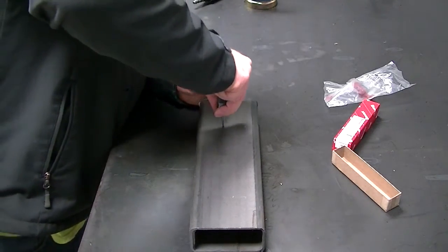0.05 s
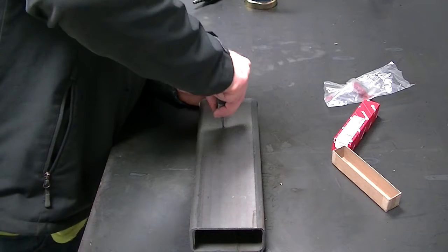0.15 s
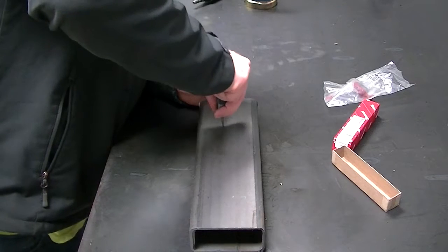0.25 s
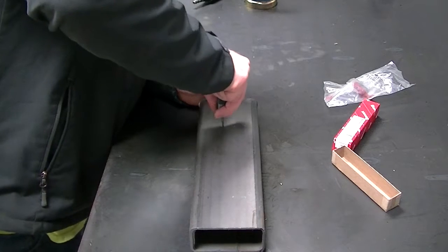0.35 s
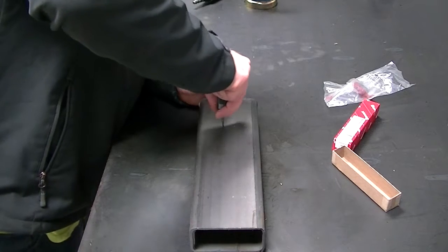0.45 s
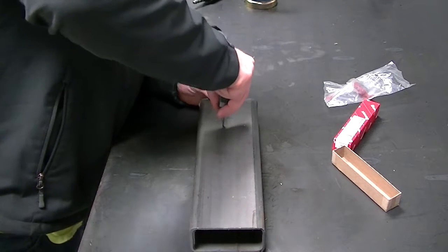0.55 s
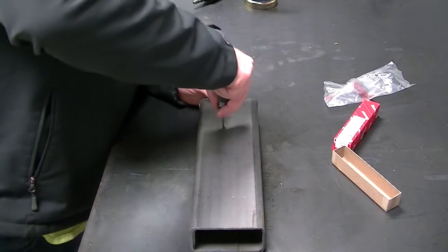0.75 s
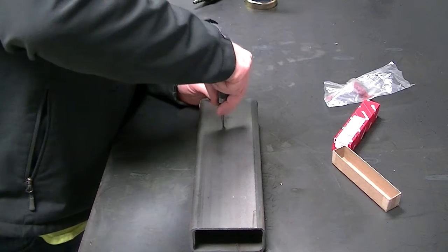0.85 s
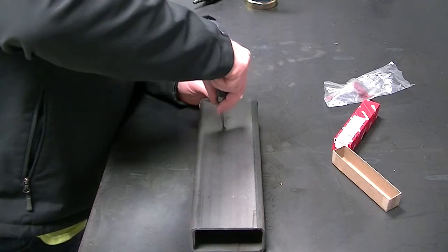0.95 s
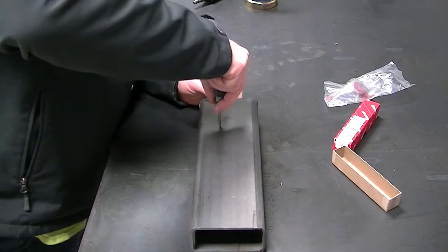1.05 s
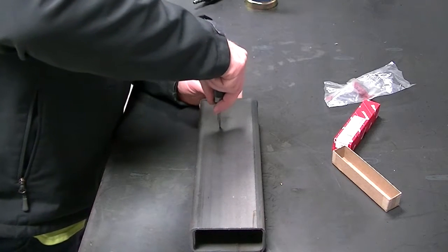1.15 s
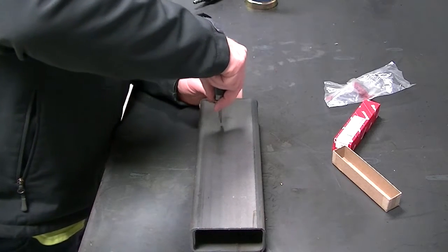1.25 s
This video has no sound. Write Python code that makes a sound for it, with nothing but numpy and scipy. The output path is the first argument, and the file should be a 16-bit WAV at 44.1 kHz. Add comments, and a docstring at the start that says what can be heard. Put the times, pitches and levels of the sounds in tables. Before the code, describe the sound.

One sharp metallic snap of a spring punch on a steel tube overloads the nearby microphone. A short, high ring fades into the echo of a hard workshop, followed by a few quieter spring clicks and dull knocks.

```python
"""An automatic centre punch is pressed onto a steel box tube on a bench in a hard, echoing workshop.
A hollow resonance fades and a sleeve rustles; the plunger knocks under load, scrapes, and fires.
The tube rings briefly and the bench thuds; the blow overloads the microphone and fills the room.
As the hand eases off, spring and plunger click back.
A low, hollow resonance follows the last knock, with faint hiss."""
import sys
import numpy as np
from scipy import signal
from scipy.fft import rfft, irfft
from scipy.io import wavfile

SR = 44100
rng = np.random.default_rng(int(sys.argv[2]) if len(sys.argv) > 2 else 0)


def dump_mix(stems):
    """Bounce the given channels to the path in sys.argv[1] as a 16-bit WAV at rate SR."""
    frames = np.atleast_2d(stems).T  # one column per channel
    limited = np.clip(frames, -1, 1)  # hard clip at full scale
    pcm = np.round(limited * 32767).astype(np.int16)
    wavfile.write(sys.argv[1], SR, pcm)


N = 57330
FIRE_S = 0.2361
# spectrum of hiss and sleeve crackle: freq_hz, density_db
HISS_SPECTRUM = [(500, 0), (2000, 16), (5000, 8.5), (9000, 2), (15000, -3)]


def undb(db):
    """Decibels to gain."""
    return 10 ** (np.asarray(db) / 20)


def clock():
    """Sample times in seconds."""
    return np.arange(N) / SR


def fade(t60_s):
    """Exponential decay, 60 dB down at t60_s."""
    return np.exp(-np.log(1000) * clock() / max(t60_s, 1e-3))


def at(start_s, x):
    """Delay x to start_s."""
    return np.concatenate([np.zeros(max(int(start_s * SR), 0)), x])[:N]


def colour(x, spectrum):
    """Unit-energy minimum-phase filter through (freq_hz, level_db) points; rolls off below the first."""
    hz, db = np.array(spectrum, float).T
    freq_hz = np.maximum(np.fft.rfftfreq(N, 1 / SR), 10)
    gain = undb(np.interp(np.log(freq_hz), np.log(hz), db)) * np.minimum(freq_hz / hz[0], 1) ** 2
    cepstrum = irfft(np.log(gain / np.sqrt(np.mean(gain ** 2))), N)
    cepstrum[1:N // 2] *= 2
    cepstrum[N // 2 + 1:] = 0
    return irfft(rfft(x) * np.exp(rfft(cepstrum)), N)


def noise(spectrum, envelope=1):
    """Unit-rms noise, enveloped, then coloured."""
    return colour(rng.standard_normal(N) * envelope, spectrum)


def ring(modes, scale=1):
    """Struck modes: decaying sines of alternating sign."""
    return sum((-1) ** k * undb(db) * fade(t60_s) * np.sin(2 * np.pi * freq * scale * clock())
               for k, (freq, db, t60_s) in enumerate(modes))


def hollow_resonance():
    """A low, hollow resonance fades at the start and follows the last knock, with faint hiss."""
    # start_s, length_s, hollow_db, hiss_db
    swells = [(-.04, 0.1, -37, -61), (.01, 0.22, -44, -48), (1.084, 0.12, -46.5, -66),
              (1.142, 0.17, -50, -67.5)]
    # freq_hz, density_db
    hollow_spectrum = [(110, -22), (165, -5.5), (240, -11), (320, -4.5), (420, 3), (540, -2.5), (700, 0.5),
                       (900, -8.5), (1200, -3), (2200, -15), (4000, -26), (15000, -33)]
    hollow, hiss = noise(hollow_spectrum), noise(HISS_SPECTRUM)
    resonance = 0
    for start_s, length_s, hollow_db, hiss_db in swells:
        swell = np.sin(np.pi * np.clip((clock() - start_s) / length_s, 0, 1))
        resonance += swell * (undb(hollow_db) * hollow + undb(hiss_db) * hiss)
    return resonance


def air():
    """Faint, steady noise of still air."""
    # freq_hz, density_db
    spectrum = [(50, -25), (90, -10.5), (170, -3), (400, 3.5), (1200, -1.5), (3000, -6), (8000, -14),
                (15000, -27.5)]
    return undb(-54) * noise(spectrum)


def sleeve():
    """Cloth crackles as the arm bears down."""
    press_s, press_width_s, level_db, creases_per_s = 0.065, 0.028, -46, 300
    creases = (rng.random(N) < creases_per_s / SR) * np.minimum(rng.exponential(size=N), np.pi)
    grains = signal.fftconvolve(creases, fade(t60_s=0.0065))[:N]
    grains /= np.sqrt(np.mean(grains ** 2))
    press = np.exp(-((clock() - press_s) / press_width_s) ** 2 / 2)
    return undb(level_db) * noise(HISS_SPECTRUM, press * grains)


def plunger():
    """Dull knocks of the plunger in its hand-held barrel."""
    # start_s, pitch_hz, level_db
    knocks = [(.159, 1817, -17.5), (0.547, 2387, -20), (1.1095, 2182, -22.5)]
    # pitch_ratio, level_db, t60_s
    barrel_modes = [(.74, -11.5, .03), (.92, -8, 0.02), (1.005, 0, 0.026), (1.1, -7, 0.0097),
                    (2.04, -20.5, 0.02)]
    rise_s = 0.00059
    rise = np.minimum(clock() / rise_s, 1)
    return sum(at(start_s, undb(db) * rise * ring(barrel_modes, hz)) for start_s, hz, db in knocks)


def scrape():
    """The plunger starts to slip: friction swells up to the release."""
    # freq_hz, density_db
    spectrum = [(200, 1), (700, 4.5), (2000, 6.5), (4500, -14.5), (9000, -17), (15000, -18)]
    swell_s, level_db = 0.018, -34.5
    wait_s = FIRE_S - clock()
    swell = np.exp(-np.abs(wait_s) / swell_s) * (wait_s > 0)
    return undb(level_db) * noise(spectrum) * swell


def blow():
    """The hammer drives the tip home: a crack of dense punch and tube modes, heard directly."""
    # freq_hz, density_db
    spectrum = [(150, -21), (450, -21), (900, -11.5), (1400, -4.5), (2200, 4), (3200, -0.5), (4500, -2),
                (5800, 0), (7500, -6), (9200, -12), (13000, -7.5), (15500, -11)]
    return at(FIRE_S, undb(5.5) * noise(spectrum, fade(t60_s=0.028)))


def tube():
    """The struck tube rings, damped by hand and bench."""
    # freq_hz, level_db, t60_s
    modes = [(1385, -13, .22), (1930, -12, .15), (2400, -13, .12), (2765, -11, .2), (4316, -11, .22),
             (4540, -7, .17), (4681, -7, .26), (5025, -6, .3), (5620, -12, .2), (6025, -9, .22),
             (6738, -6, .2), (7338, -10, .24), (8122, -4, .17), (12680, -14, .17)]
    return at(FIRE_S, undb(-7.5) * ring(modes))


def radiated_blow():
    """Tube and bench send the blow to the walls: a pulse and a short clang of high steel modes."""
    # freq_hz, gain_db
    radiation = [(100, -41), (220, -16.5), (330, -15.5), (430, -5), (570, -13), (720, -4.5), (930, -9.5),
                 (1150, 0), (1400, 0), (1620, -4), (1950, 5.5), (2700, 2), (3250, -3), (3600, 0), (3950, 0),
                 (4550, 1.5), (5050, -1), (5600, 1.5), (6300, 0.5), (7200, 5), (9200, -3), (10400, 0),
                 (11700, -5.5), (12650, 3), (13300, -5.5), (15500, -14.5)]
    highpass_hz, level_db = 2950, 26.5
    clang = undb(-21.5) * rng.standard_normal(N) * fade(t60_s=0.04)
    clang = signal.sosfilt(signal.butter(2, highpass_hz, "high", fs=SR, output="sos"), clang)
    return at(FIRE_S, undb(level_db) * colour(signal.unit_impulse(N) + clang, radiation))


def bench():
    """The bench thuds under the blow."""
    # freq_hz, level_db, t60_s
    modes = [(65, -37.5, 0.045), (110, -24, 0.034), (190, -24.5, .035)]
    lag_s = 0.005
    return at(FIRE_S + lag_s, ring(modes))


def spring():
    """The coils slip: each click is a dry snap and a short, high ring."""
    # start_s, ring_db, snap_db
    clicks = [(.522, -34.5, -58), (.5485, -41, -24), (.5505, -34, -24), (.842, -48.5, -62),
              (.8852, -22.5, -31), (.887, -27.5, -31.5), (.8902, -25, -29.5), (1.178, -46, -54)]
    # freq_hz, level_db, t60_s
    modes = [(5719, -10.5, 0.052), (6760, -21, 0.079), (8300, -29, 0.059), (9620, -6, 0.022),
             (10010, -9.5, 0.024), (10470, -13.5, 0.024), (13100, -18, 0.016)]
    # freq_hz, density_db
    snap_spectrum = [(400, -14), (1700, 2.5), (2600, 8.5), (4000, -6.5), (5200, -1.5), (5750, -7),
                     (6500, -10), (8600, -5), (9700, -14), (11000, -16), (15500, -29)]
    clicking = 0
    for start_s, ring_db, snap_db in clicks:
        snap = undb(snap_db) * noise(snap_spectrum, fade(t60_s=0.029))
        clicking += at(start_s, undb(ring_db) * ring(modes) + snap)
    return clicking


def workshop(x):
    """Early reflections and a long diffuse tail whose treble dies first."""
    # freq_hz, t60_s, level_db
    reverb_bands = [(101.6, 0.76, -12), (384, 2.28, -0.5), (940, 1.77, 2), (2376, 2.286, -5.5),
                    (4074, 1.54, 3), (5830, 1.02, -4.5), (8920, 0.59, -5), (12960, 0.34, -4)]
    onset_s, early_db, tail_db = 0.004, -6.5, -2
    hz, t60_s, db = np.array(reverb_bands, float).T
    log_hz = np.log(hz)
    log_bins = np.log(np.maximum(np.fft.rfftfreq(N, 1 / SR), 1))
    centres = np.linspace(log_hz[0], log_hz[-1], 24)
    scatter, tail = rfft(rng.standard_normal(N)), 0
    for centre, pick in zip(centres, np.eye(len(centres))):
        band = irfft(scatter * np.interp(log_bins, centres, pick), N)
        tail += band * fade(np.interp(centre, log_hz, t60_s)) * undb(np.interp(centre, log_hz, db))
    tail /= np.linalg.norm(fade(t60_s=0.97))
    early = rng.standard_normal(N) * fade(t60_s=0.16)
    response = undb(tail_db) * tail + undb(early_db) * early / np.linalg.norm(early)
    return signal.fftconvolve(x, response * np.minimum(clock() / onset_s, 1))[:N]


def scene():
    """The radiated blow, tube ring, plunger knocks and spring clicks excite the room; the other layers stay
    dry."""
    knocks, ringing, clicks = plunger(), tube(), spring()
    send = radiated_blow() + undb(-1.5) * knocks + undb(-15) * ringing + undb(-2.5) * clicks
    echo = workshop(send)
    close = bench() + scrape() + hollow_resonance() + sleeve() + air()
    return (knocks + blow() + ringing + clicks + echo + close)[None]


def record(dry):
    """The blow clips the microphone; a steep low-pass cuts the top."""
    clip_level, lowpass_hz = 0.92, 15700
    clipped = np.clip(dry, -clip_level, clip_level)
    return signal.sosfilt(signal.ellip(10, 0.1, 70, lowpass_hz, fs=SR, output="sos"), clipped)


dry = scene()
out = record(dry)
dump_mix(out)
```